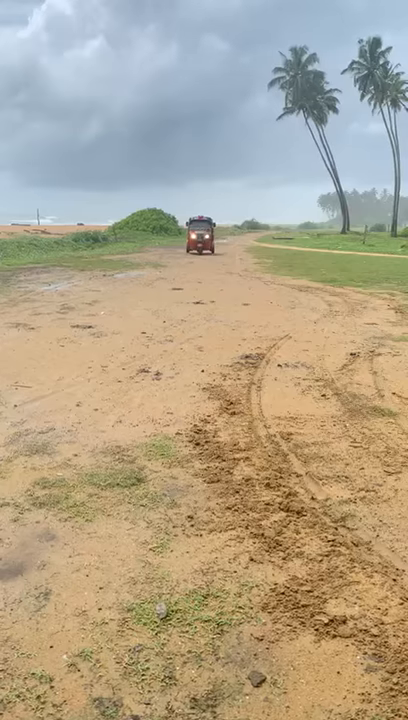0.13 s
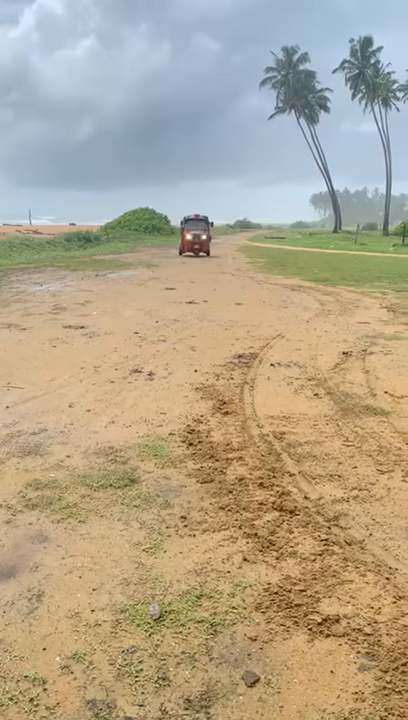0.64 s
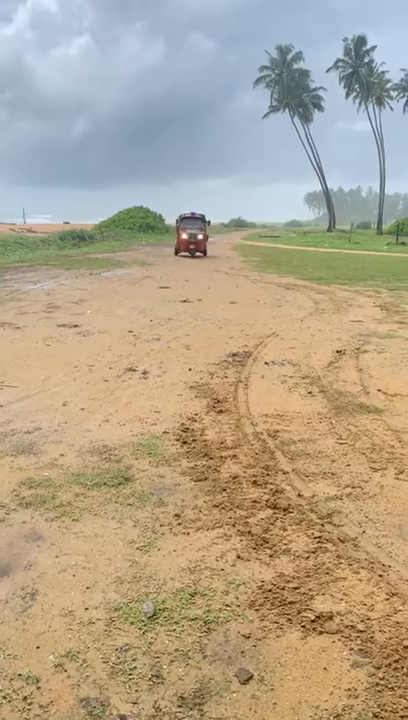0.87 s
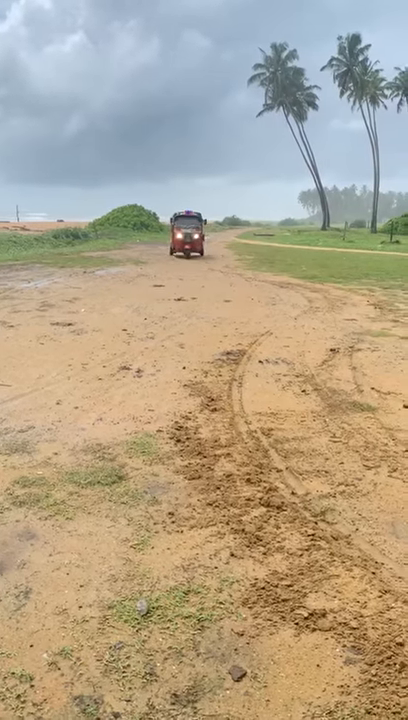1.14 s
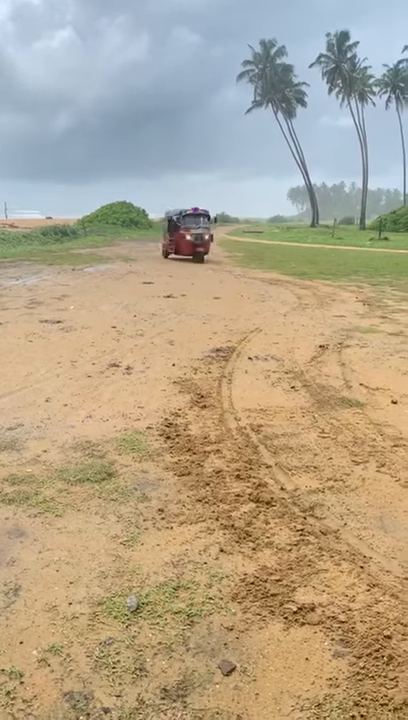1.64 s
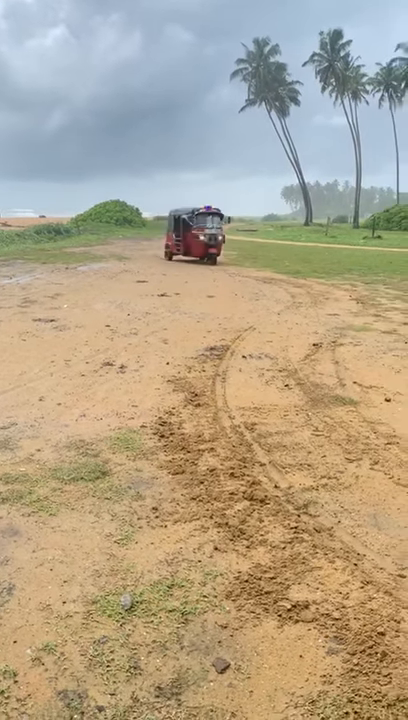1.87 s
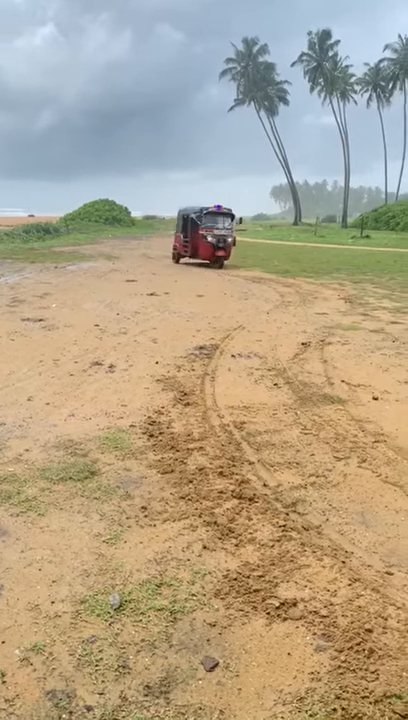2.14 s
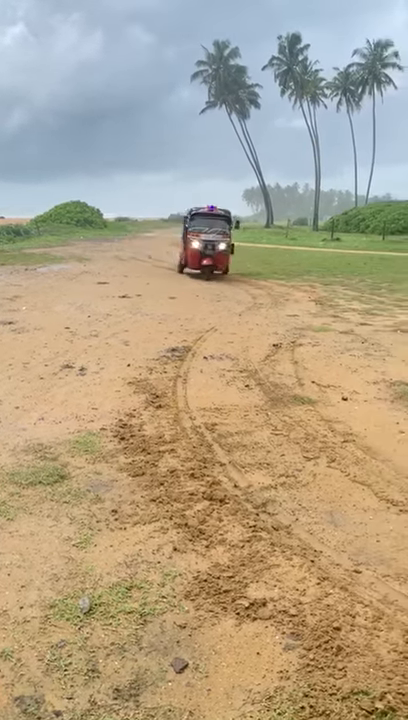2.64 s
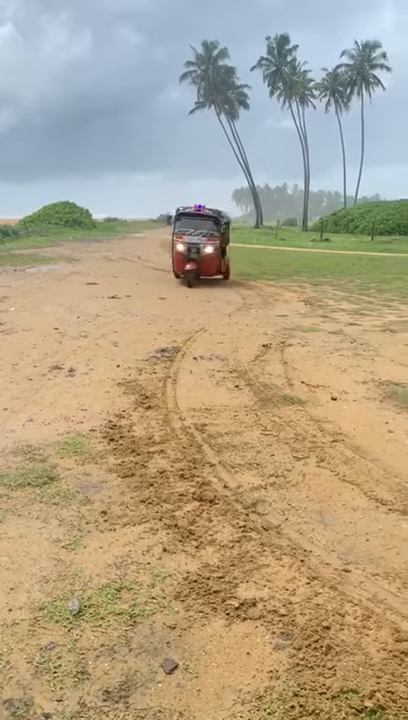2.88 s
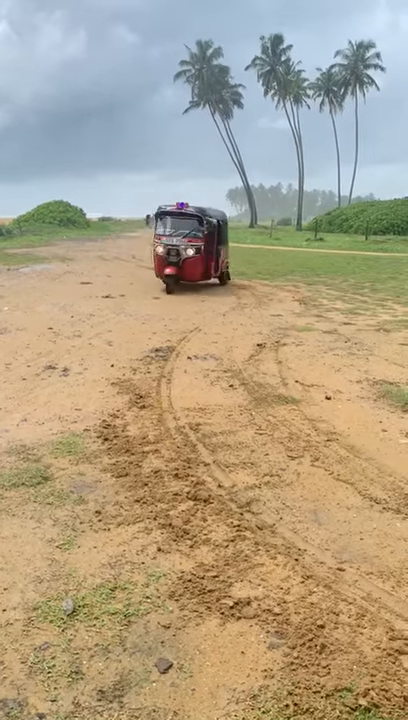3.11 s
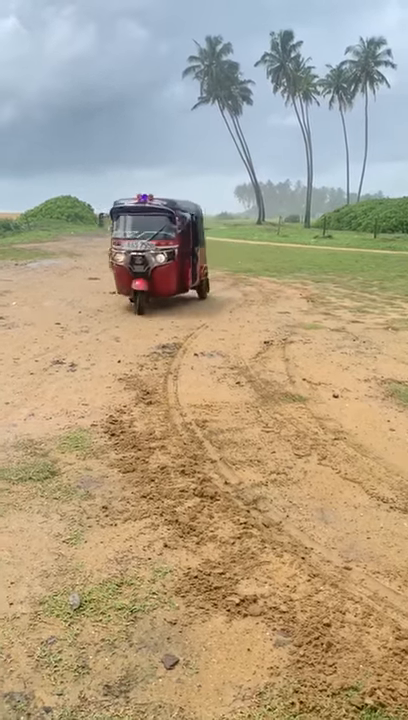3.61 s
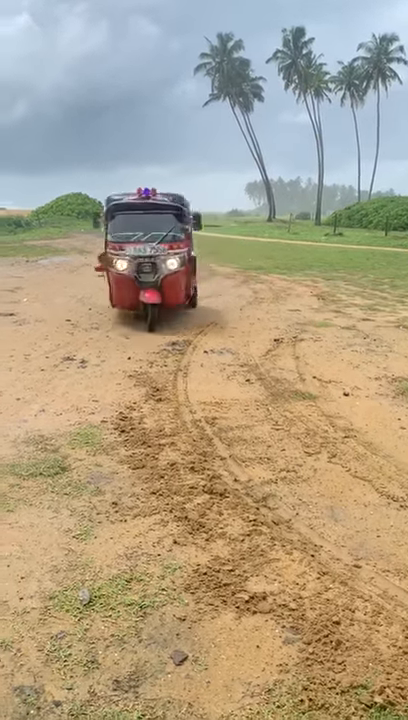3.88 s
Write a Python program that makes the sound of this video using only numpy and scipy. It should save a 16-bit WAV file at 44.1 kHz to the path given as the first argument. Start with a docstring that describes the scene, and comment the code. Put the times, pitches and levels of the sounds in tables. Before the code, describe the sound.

Throbbing little engine of a three-wheeler approaches unevenly, rattling and growing louder, as wind thumps the microphone.

```python
"""A small three-wheeled taxi drives towards the listener over open, bumpy dirt.
After a very short silence it is far off: its single cylinder throbs about 36 times a second,
gears sing at multiples of that rate, and a steady narrow whine near 4 kHz fades by 1.35 s.
Then the engine climbs, eases and climbs unevenly to 49 firings a second, while bodywork clatter
and hiss, both shaped noise, grow louder. Wind rumbles throughout; from 1.3 to 3.3 s it thumps on the two ports."""
import sys
import numpy as np
from scipy import signal
from scipy.fft import rfft, irfft
from scipy.io import wavfile
from scipy.ndimage import uniform_filter1d

SR = 44100
rng = np.random.default_rng(int(sys.argv[2]) if len(sys.argv) > 2 else 0)


def to_linear_factor(level_db):
    """Convert decibel levels (scalar or array-like) to linear amplitude factors."""
    exponent = np.asarray(level_db, float) / 20
    return 10 ** exponent


def to_wav(s):
    """Save 16-bit WAV."""
    ch = np.atleast_2d(s).T  # columns
    pcm = np.round(np.clip(ch, -1, 1) * 32767)  # PCM
    wavfile.write(sys.argv[1], SR, pcm.astype(np.int16))


N = 176400  # samples: 4 s


def rms_one(x):
    """Scales to an average strength (rms) of 1."""
    return x / np.sqrt(np.mean(x ** 2) + 1e-20)


def in_time(rows):
    """Turns each column after the time column into a smooth-running curve."""
    s, *columns = np.transpose(rows)
    return [np.interp(np.arange(N) / SR, s, c) for c in columns]


def drift(rate):
    """Slow random wandering of spread 1; a higher rate [Hz] wanders faster."""
    r = np.exp(-80 * np.pi * rate / SR)  # one random step every 40 samples
    steps = rng.standard_normal(N // 40 + 2002)
    slow = signal.lfilter([1], [1, -2 * r, r * r], steps)[2000:]
    return np.interp(np.arange(N) / 40, np.arange(len(slow)), rms_one(slow - slow.mean()))


def colour(x, points):
    """Shapes the spectrum by (frequency [Hz], gain [dB]) points: -70 dB below them, last gain above."""
    hz, db = np.transpose(points)
    log_hz = np.log(np.arange(N // 2 + 1) * SR / N + 1)
    return irfft(rfft(x) * to_linear_factor(np.interp(log_hz, np.log(hz), db, left=-70)), N)


def puffs(cycle):
    """A quick rise and a decay for every firing, each of its own strength."""
    sharpness, spread_db, rise_s = 1.05, .6, .0055
    strength = to_linear_factor(spread_db * rng.standard_normal(300))[cycle.astype(int)]
    decay = np.exp(-2 * sharpness * (cycle % 1))
    return uniform_filter1d(strength * decay, size=int(rise_s * SR))


def exhaust(cycle, firing_hz, level_db):
    """Tones at whole multiples of the firing rate, each wavering a little on its own."""
    # strength of each tone: (multiple of firing rate, relative level [dB])
    orders = [(1, -8), (2, -8), (3, 3), (4, -6), (5, -7), (6, -9), (7, -8), (8, -14), (9, -23), (10, -25),
              (11, -21), (12, -20), (13, -10), (14, -20), (15, -23), (16, -21), (17, -19), (18, -22)]
    # the silencer lifts tones that cross its resonance: (frequency [Hz], gain [dB])
    silencer = [(186, 0), (196, 9), (210, 0)]
    share_db, waver_db, phase_waver = -1.5, 1.5, .25  # phase waver in radians
    out = 0
    for k, db in orders:
        lift_db = np.interp(k * firing_hz, *np.transpose(silencer))
        strength = to_linear_factor(db + lift_db + waver_db * drift(9.3))
        phase = 2 * np.pi * k * cycle + phase_waver * drift(9.0) + .3 * k * k
        out = out + strength * np.sin(phase)
    return to_linear_factor(level_db + share_db) * np.sqrt(2) * out


def gears(cycle, firing_hz, puff, levels_db):
    """Three multiples of the tooth rate, sagging within each cycle and blurred by uneven turning."""
    # the crank is kicked at each firing and slows until the next, more under load:
    # (time [s], swing [share of speed])
    crank_swing = [(0, .008), (.75, .008), (1.0, .015), (2.4, .016), (2.7, .026), (4, .024)]
    teeth_per_firing, throb, flicker_db = 36, .45, 1.8
    jitters = (.006, .005, .010)  # share of speed, for each multiple
    swing, = in_time(crank_swing)
    crank = cycle + swing * (cycle % 1) * (1 - cycle % 1)
    out = 0
    for k, (db, jitter) in enumerate(zip(levels_db, jitters), start=1):
        uneven = np.cumsum(jitter * firing_hz * drift(69.0)) / SR
        turn = 2 * np.pi * teeth_per_firing * (crank + uneven)
        out = out + np.sqrt(2) * to_linear_factor(db + flicker_db * drift(22.0)) * np.sin(k * turn)
    return out * (1 - throb + throb * puff)


def panels(x):
    """As the body sways over bumps, each range of its ringing swells and sinks on its own."""
    edges_hz, shift_db = [0, 930, 1200, 1380, 1600, 22050], 1.8
    hz, spectrum = np.arange(N // 2 + 1) * SR / N, rfft(x)
    out = 0
    for low, high in zip(edges_hz, edges_hz[1:]):
        part = irfft(spectrum * ((hz >= low) & (hz < high)), N)
        out = out + to_linear_factor(shift_db * drift(4.3)) * part
    return out


def clatter(cycle, puff, level_db):
    """Each firing rings engine case and panels: a knock pattern repeated every cycle, plus fresh noise."""
    # ringing of case and panels: (frequency [Hz], relative level [dB])
    ringing = [(200, -8.5), (320, -20.5), (470, -24.5), (580, -4), (680, -6.5), (770, 0.5), (930, -14),
               (1100, -1), (1300, 3), (1500, -3), (1600, -10), (1900, -4), (2150, -11), (2350, -18.5),
               (2600, -11.5), (2950, -16), (3400, -16.5), (3650, -65), (4050, -15), (4400, -31),
               (4750, -20), (5200, -53), (6500, -51)]
    knock_share, noise_floor, trim_db = .6, 1.05, -1.5
    knocks = rng.standard_normal(400)[(cycle % 1 * 400).astype(int)]
    fresh = (noise_floor + puff) * rng.standard_normal(N)
    drive = knock_share * (.5 + puff) * knocks + (1 - knock_share) * fresh
    return to_linear_factor(level_db + trim_db) * rms_one(panels(colour(drive, ringing)))


def hiss(puff, level_db):
    """Intake, fan and tyres on grit: treble noise that flickers and throbs slightly with the firings."""
    # tone of the hiss: (frequency [Hz], relative level [dB])
    hiss_tone = [(3000, -31), (3700, -28.5), (4100, -0.5), (4450, -13.5), (4700, -6.5), (5100, -8.5),
                 (5500, -4.5), (7000, -5), (7600, -3.5), (8400, 0.5), (9500, -7), (11000, -7.5),
                 (11600, -22), (12000, -33)]
    trim_db, throb, flicker_db = 4.5, .044, 1
    flicker = to_linear_factor(flicker_db * (drift(13.3) + drift(40)))
    rough = (1 - throb + throb * puff) * flicker
    return to_linear_factor(level_db + trim_db) * rms_one(colour(rough * rng.standard_normal(N), hiss_tone))


def whine(puff):
    """Narrow noise near 4 kHz, throbbing lightly, heard while the taxi is far."""
    # loudness of the whine: (time [s], level [dB])
    whine_level = [(0, -56), (.4, -53), (.45, -67), (.52, -52), (.75, -53.5), (1.1, -57), (1.35, -66)]
    # its narrow range: (frequency [Hz], relative level [dB])
    whine_band = [(3750, -34), (3900, 5.5), (3970, -2), (4060, 0), (4250, -32), (4400, -68.5)]
    level_db, = in_time(whine_level)
    return to_linear_factor(level_db) * rms_one(colour((1 + puff) * rng.standard_normal(N), whine_band))


def buffets():
    """Single thumps of wind: each is a strong swing between two opposite ones."""
    # the thumps: (time [s], peak level [dB], frequency [Hz])
    thumps = [(1.331, -24, 55), (1.358, -9.5, 117), (1.5, -16, 75), (1.762, -15, 119), (2.111, -15.5, 56),
              (2.201, -12, 83.7), (2.219, -12.5, 147), (2.241, -13, 49), (2.292, -14, 131),
              (2.369, -13.5, 154), (2.539, -15.5, 110), (2.934, -18.5, 69), (2.991, -13, 83),
              (3.005, -17, 121), (3.022, -18, 77), (3.251, -16.5, 93)]
    cycles = 1.97  # length of a thump, in swings
    t, out = np.arange(N) / SR, 0
    for s, db, hz in thumps:
        turn = hz * (t - s)
        swell = np.cos(np.pi * np.clip(turn / cycles, -.5, .5)) ** 2
        swing = np.cos(2 * np.pi * turn)
        # faster ripples make the thump lopsided
        swing = swing + .25 * np.sin(4.6 * np.pi * turn) + .15 * swell * np.sin(9.5 * np.pi * turn)
        out = out + to_linear_factor(db) * swell * swing
    return out


def wind():
    """Lumpy rumble of gusts on the ports, and a steady far roar, both from shaped noise."""
    # strength of the gusts, before the lift below: (time [s], relative level [dB])
    gusts = [(0.05, -35), (0.32, -32), (0.84, -35.5), (1.14, -31), (2.21, -32), (2.34, -30), (2.5, -31.5),
             (2.8, -39.5), (3.14, -31), (4.0, -29)]
    # tone of the rumble: (frequency [Hz], relative level [dB])
    rumble_tone = [(12, -49), (20, -1), (49, 5.5), (130, 1.5), (200, -6.5), (248, -9), (437, -20),
                   (500, -22.5), (650, -72), (1100, -120)]
    # tone of the far roar: (frequency [Hz], relative level [dB])
    roar_tone = [(60, -1), (150, -5.5), (300, -8), (500, -16.5), (1000, -20.5), (2000, -20), (3600, -30.5),
                 (6000, -51.5)]
    lift_db, lump_db, roar_db = 3.5, 1.5, -35.5
    gust_db, = in_time(gusts)
    lumps = to_linear_factor(lump_db * drift(39)) * rng.standard_normal(N)
    rumble = to_linear_factor(gust_db + lift_db) * rms_one(colour(lumps, rumble_tone))
    roar = to_linear_factor(roar_db) * rms_one(colour(rng.standard_normal(N), roar_tone))
    return rumble + roar


def scatter(mono):
    """Moving air scatters part of the sound: its phase wanders, and it is unlike in the two ports."""
    # how much is scattered: (frequency [Hz], gain [dB])
    unlike = [(30, -24), (120, -17), (400, -15), (800, -16), (1050, -26), (1450, -15), (1700, -24),
              (2000, -10), (2230, -18), (2450, -8), (2900, -7), (3400, -15), (3800, -8), (4000, -11),
              (4400, -7), (5000, -7), (5250, -60), (5750, -60), (6100, -9), (6500, -7), (7100, -10),
              (7600, -50), (9000, -50), (9500, -10), (10250, -6), (10600, -50)]
    wander_turns = .55
    turning = np.exp(2j * np.pi * wander_turns * drift(16.3))
    return colour((signal.hilbert(mono) * turning).real, unlike)


def scene():
    """All sources at one point, plus a scattered part of opposite sign left and right."""
    # engine speed and gear tones: (time [s], firing rate [Hz], tooth-rate level [dB],
    # second multiple level [dB], third multiple level [dB])
    engine_speed = [(0, 35.64, -38, -47.5, -61), (.3, 35.42, -33.5, -46, -70),
                    (.45, 35.5, -35.5, -48, -63.5), (.7, 35.89, -40.5, -51, -57),
                    (.8, 39.28, -42.5, -54, -55), (.95, 39.65, -44.5, -48.5, -56),
                    (1.28, 40.33, -42.5, -50, -60), (1.4, 42.49, -48, -38, -55),
                    (1.5, 42.63, -62, -42.5, -54), (1.6, 41.61, -58, -61, -54), (1.7, 42.03, -44, -44, -57),
                    (1.85, 40.29, -35.5, -45.5, -57), (2.0, 39.7, -38.5, -45, -50),
                    (2.16, 38.61, -39, -45, -48), (2.32, 40.76, -32, -46, -50),
                    (2.38, 43.33, -37, -44, -50), (2.6, 43.74, -56, -48, -46),
                    (2.745, 47.42, -35, -29.5, -49.5), (2.8, 45.31, -44, -37.5, -54),
                    (2.89, 46.1, -30, -29, -46), (3.0, 43.8, -52, -37, -50), (3.1, 48.15, -28, -32.5, -45),
                    (3.19, 45.01, -36, -30.5, -45), (3.48, 44.1, -46.5, -33, -48),
                    (3.62, 41.57, -24, -34.5, -46), (3.76, 46.28, -53, -27.5, -39),
                    (3.86, 48.7, -28, -33.5, -47), (4, 49.02, -46, -32, -34)]
    # loudness as it comes near, before each source's own trim:
    # (time [s], clatter level [dB], hiss level [dB], exhaust level [dB])
    coming_near = [(0.05, -44.5, -51.5, -35), (0.09, -39.5, -58, -48), (0.21, -45, -54, -43),
                   (1.02, -31, -56, -40.5), (1.41, -31.5, -52.5, -33.5), (2.05, -30.5, -52.5, -41),
                   (2.14, -28, -53, -39), (2.21, -29.5, -53.5, -33.5), (2.41, -26, -52, -37),
                   (2.48, -26, -49, -35.5), (3.13, -24, -42, -32), (3.48, -21.5, -44, -27),
                   (3.58, -27.5, -44, -36.5), (3.66, -23, -41.5, -29), (3.84, -22, -37, -31.5),
                   (4.0, -22.5, -37.5, -31)]
    firing_hz, *gear_db = in_time(engine_speed)
    clatter_db, hiss_db, exhaust_db = in_time(coming_near)
    # count of firings so far; the speed wavers by a share of .002
    cycle = np.cumsum(firing_hz * (1 + .002 * drift(15.3))) / SR
    puff = rms_one(puffs(cycle))
    engine = exhaust(cycle, firing_hz, exhaust_db) + gears(cycle, firing_hz, puff, gear_db)
    body = clatter(cycle, puff, clatter_db) + hiss(puff, hiss_db)
    mono = engine + body + whine(puff) + buffets() + wind()
    scattered = scatter(mono)
    return np.array([mono + scattered, mono - scattered])


def low_pass(x):
    """Removes everything above the highest recorded frequency."""
    return signal.sosfilt(signal.butter(12, 11650, fs=SR, output="sos"), x)


def record(dry):
    """The two ports differ in phase; sound begins after a short silence."""
    # lead of the left port over the right: (frequency [Hz], lead [half turns])
    port_phase = [(0, 0), (1350, -.05), (1700, 0), (1950, .1), (2240, .02), (2400, .62), (2600, .62),
                  (2900, .3), (3100, .55), (3450, .17), (3650, .1), (3950, .17), (4500, .58), (5000, .6),
                  (5230, 1), (5900, 1), (6200, 1.25), (6700, 1.6), (7300, 1.95), (7550, 2), (9200, 2),
                  (10100, 2.55), (10550, 3), (22050, 3)]
    start_s = .035
    hz, lead = np.transpose(port_phase)
    # each port takes half of the lead, in opposite directions
    half = np.exp(.5j * np.pi * np.interp(np.arange(N // 2 + 1) * SR / N, hz, lead))
    ports = irfft(rfft(dry) * [half, half.conj()], N)
    ports = ports * (np.arange(N) > start_s * SR)
    return low_pass(ports)


dry = scene()
out = record(dry)
to_wav(out)
```